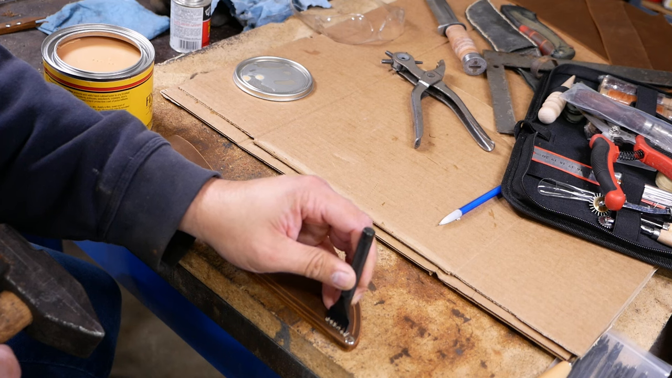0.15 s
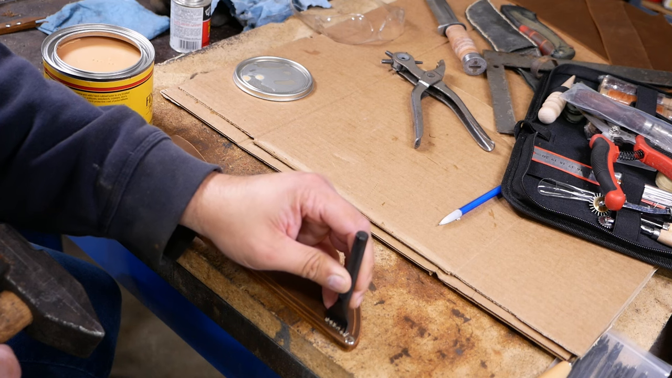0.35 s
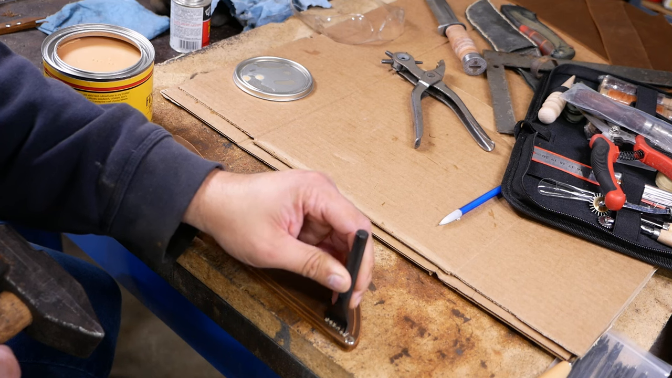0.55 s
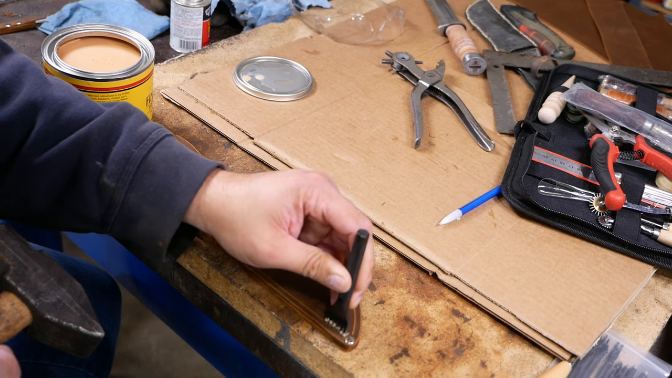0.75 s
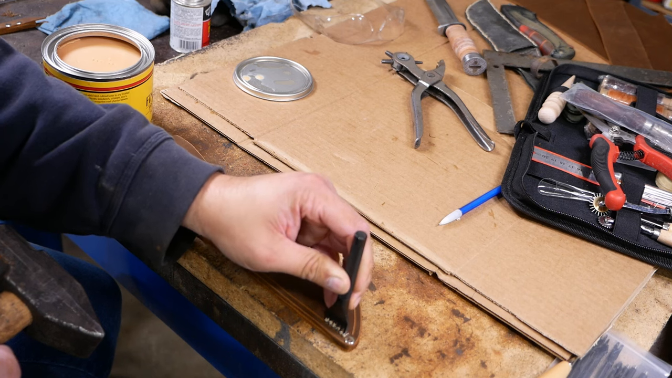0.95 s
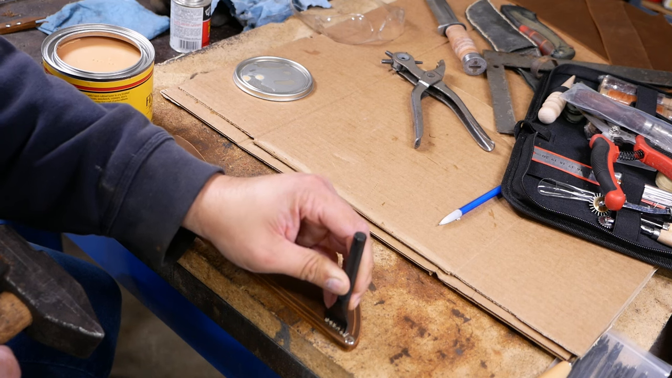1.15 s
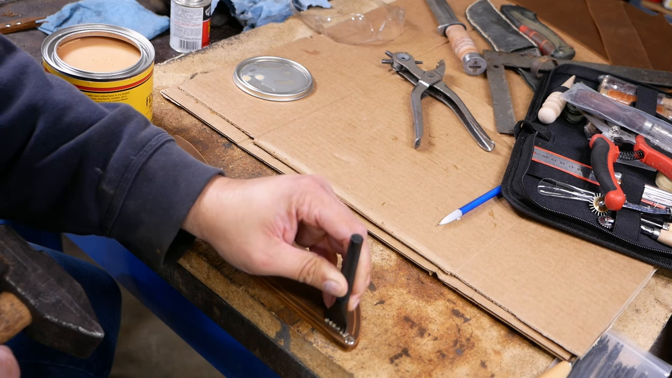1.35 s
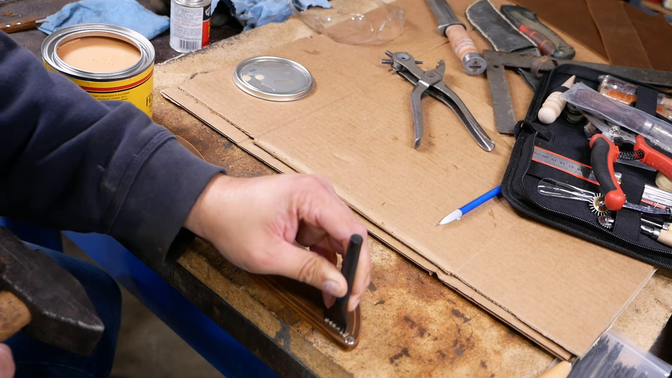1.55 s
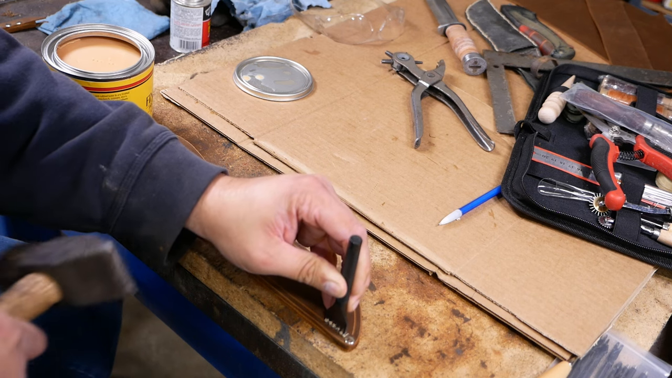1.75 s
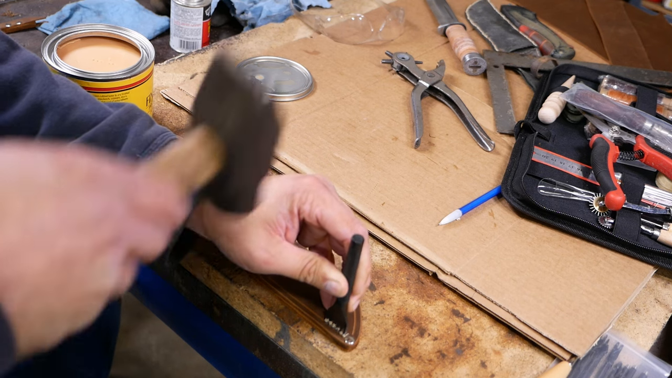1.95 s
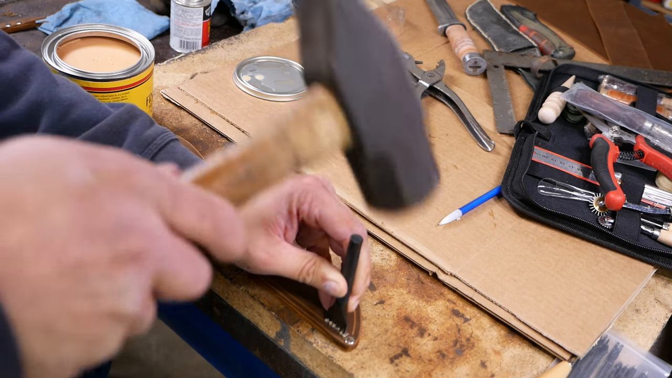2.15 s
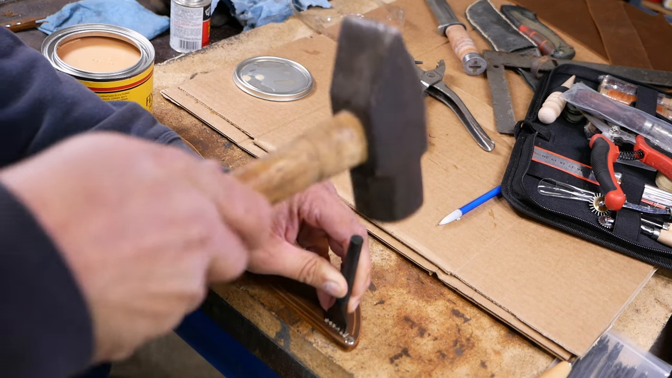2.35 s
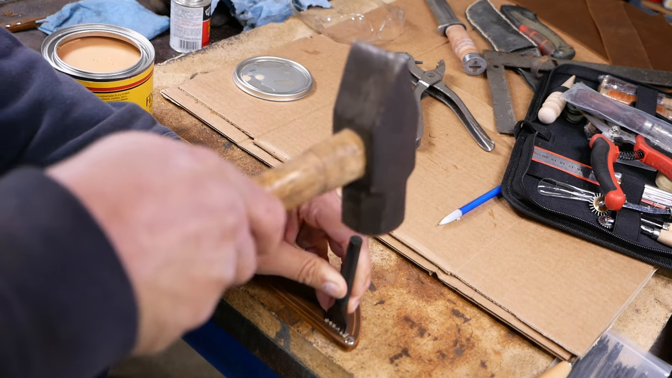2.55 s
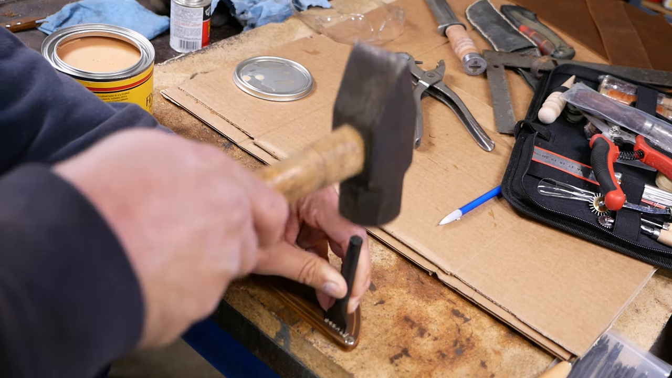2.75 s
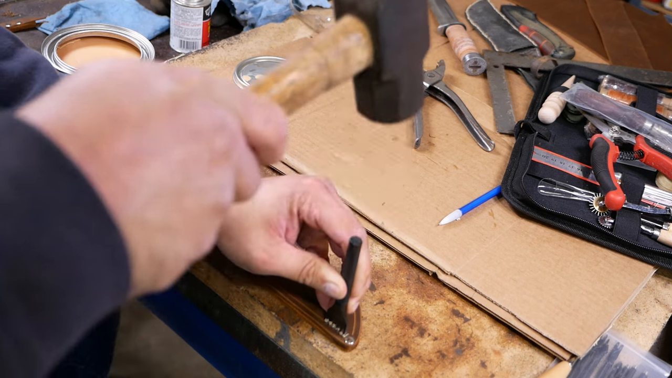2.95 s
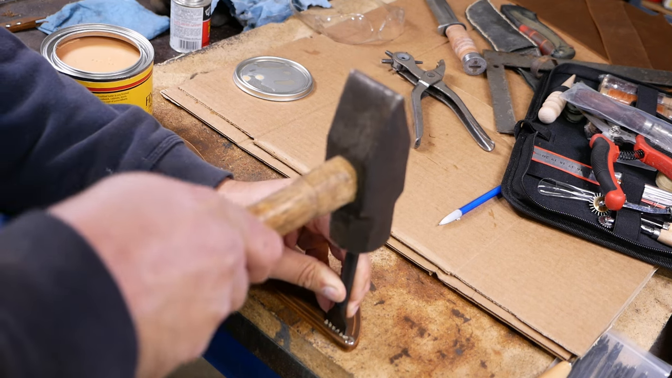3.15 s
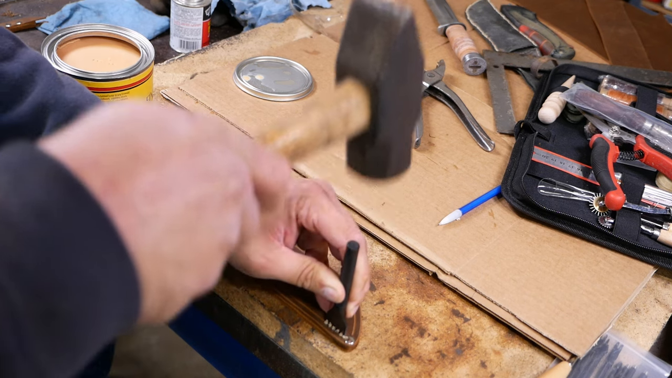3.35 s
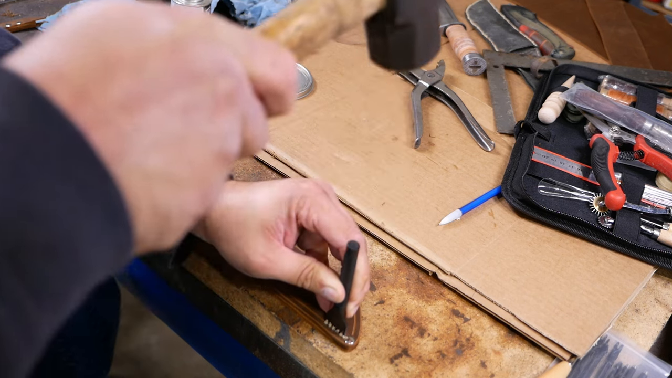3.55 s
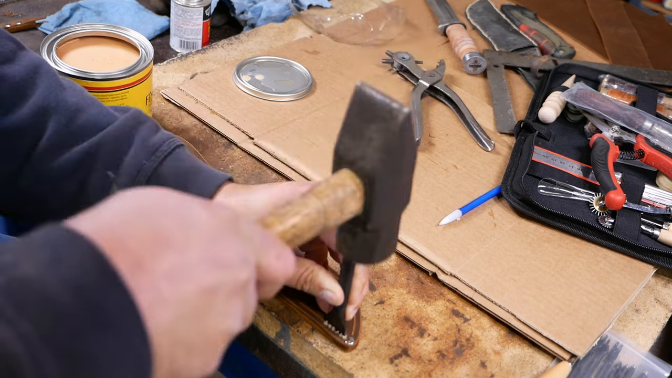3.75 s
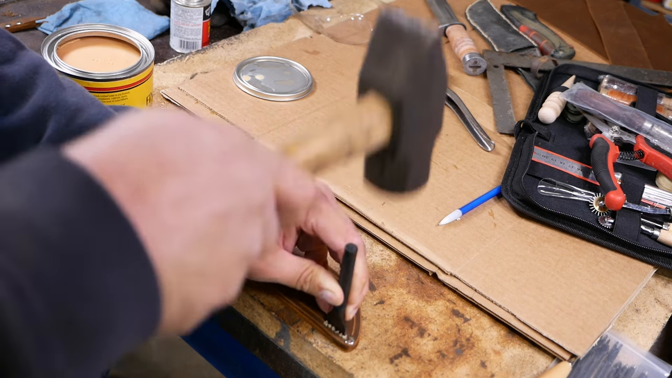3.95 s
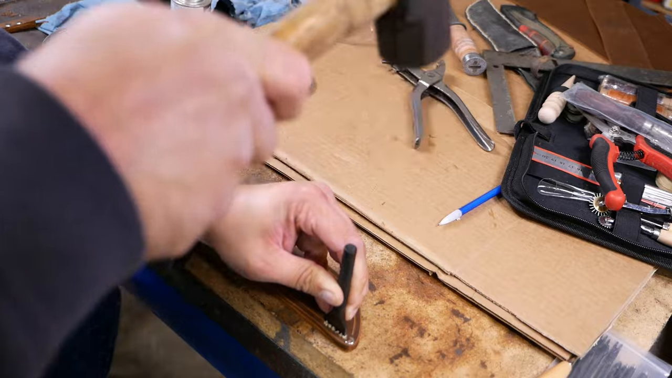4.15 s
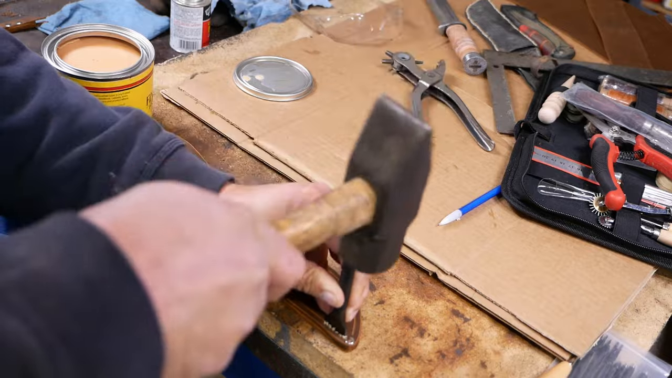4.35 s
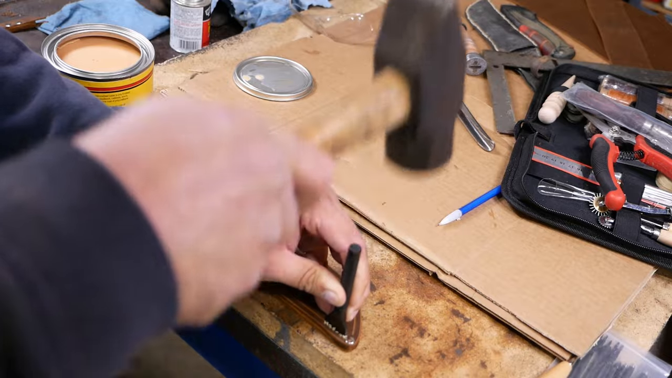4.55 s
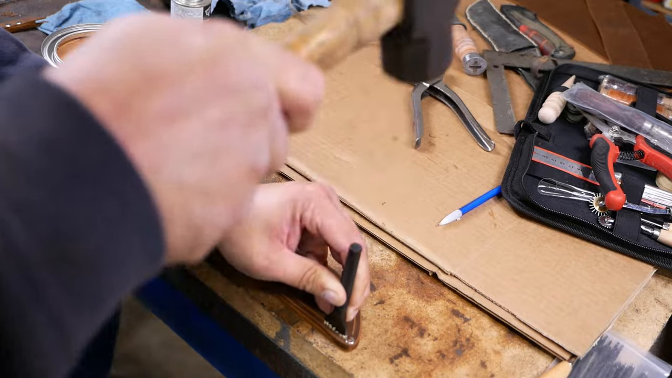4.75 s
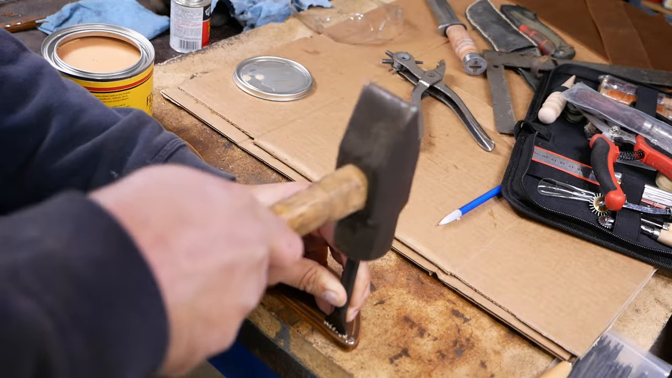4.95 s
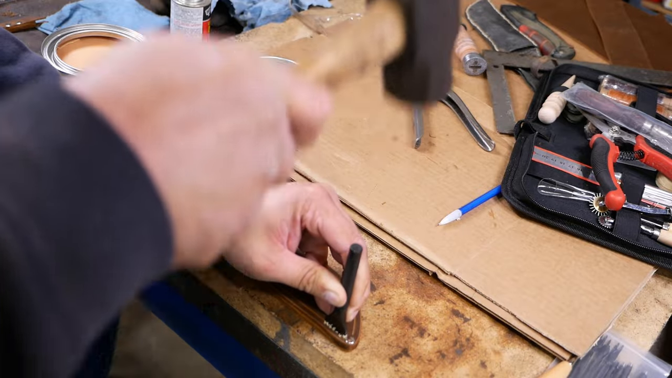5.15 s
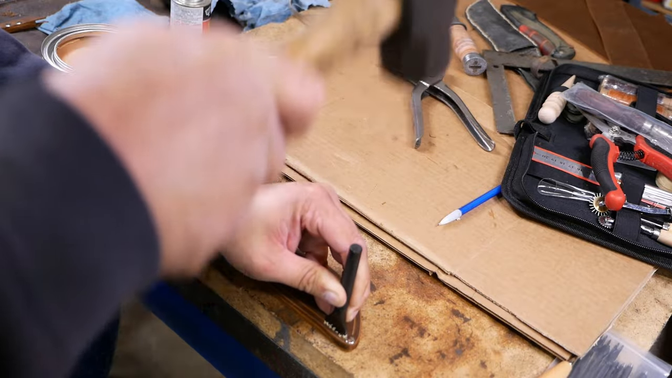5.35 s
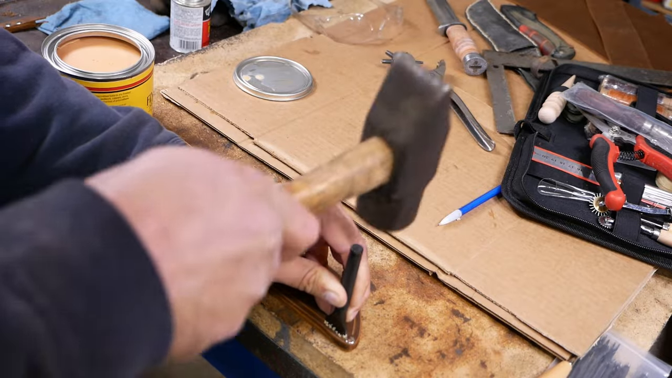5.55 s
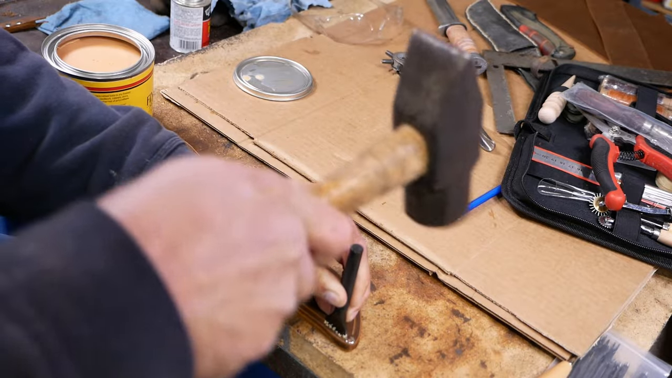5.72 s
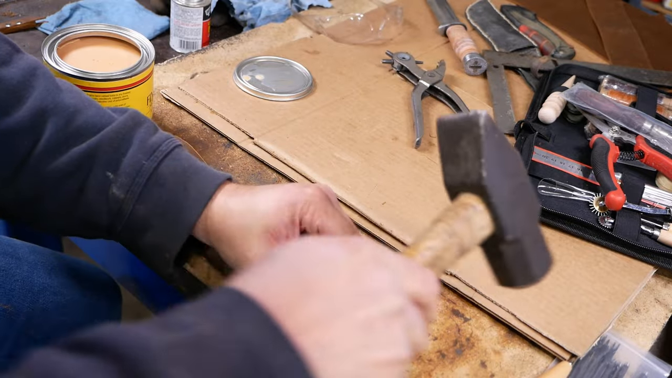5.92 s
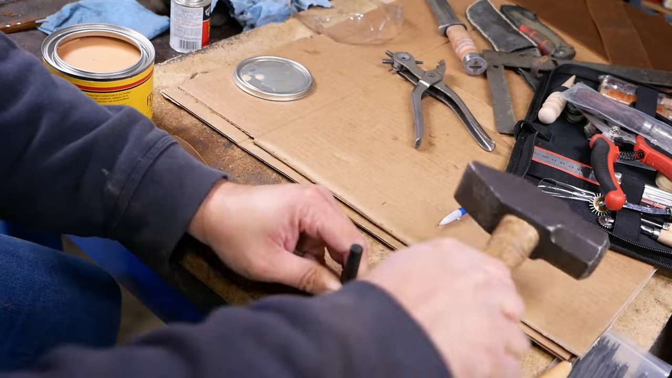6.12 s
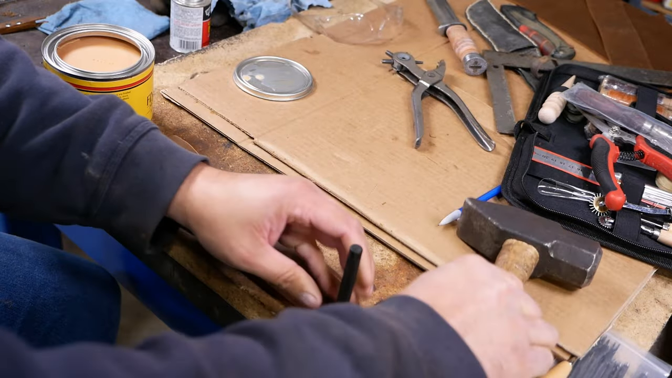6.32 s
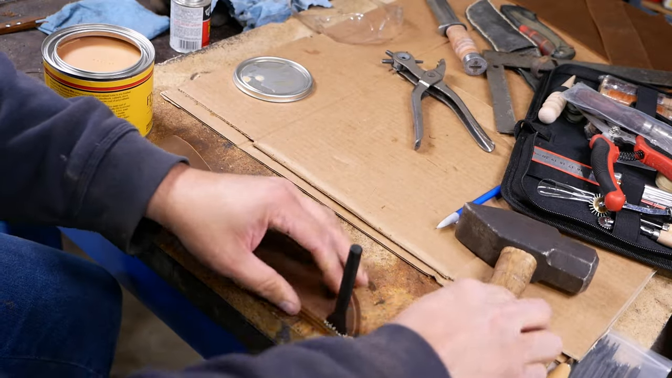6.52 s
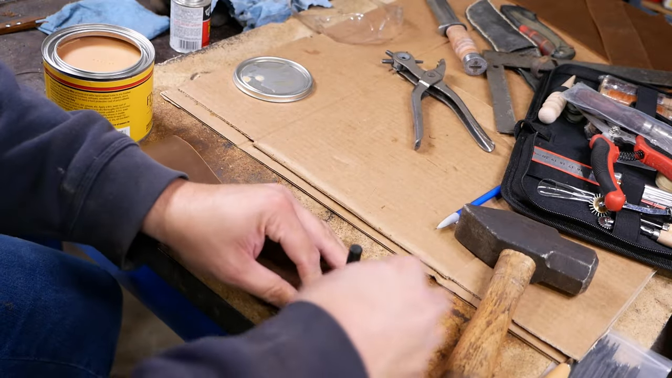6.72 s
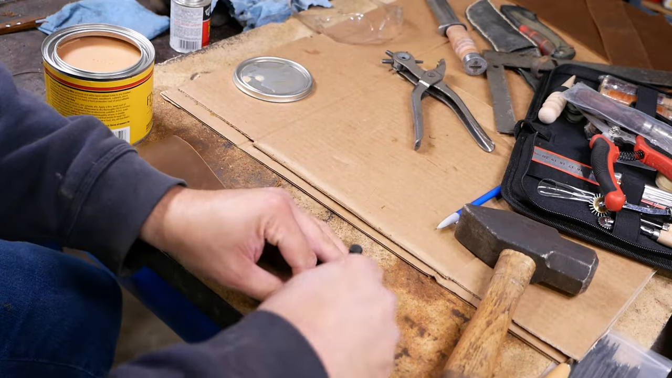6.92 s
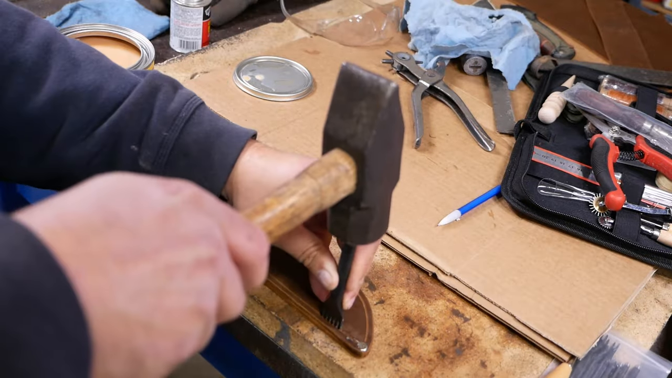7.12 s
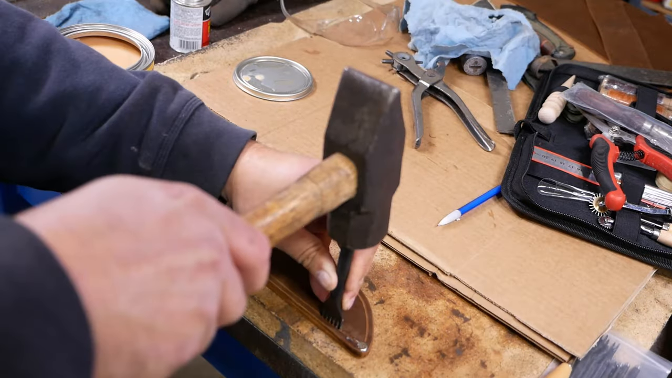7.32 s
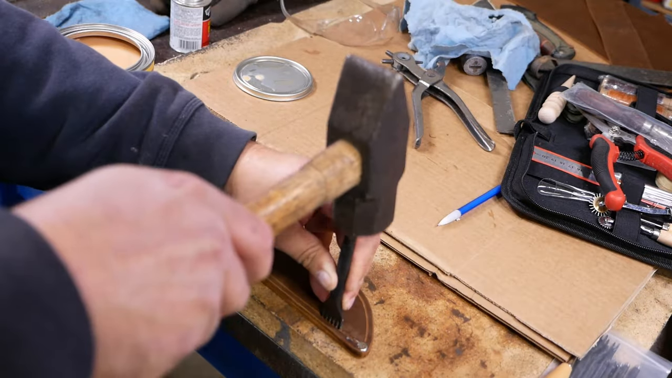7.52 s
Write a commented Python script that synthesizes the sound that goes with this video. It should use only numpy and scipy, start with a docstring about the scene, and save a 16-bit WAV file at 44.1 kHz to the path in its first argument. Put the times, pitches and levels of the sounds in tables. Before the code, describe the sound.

Four loud, clipped hammer blows on a chisel, each blooming into long echo, then tool clicks, a dull thud and two faint taps.

```python
"""A steel hammer drives a pronged chisel through leather on a wooden bench: five blows that overload the microphone,
each followed by a slowly swelling reverberation. A sleeve rustles as the hammer is raised; afterwards the chisel is
pulled free, the hammer is put down, and its head is rested on the chisel again. A low hum fills the workshop."""
import sys
import numpy as np
from scipy import signal
from scipy.fft import rfft, irfft
from scipy.io import wavfile
from scipy.ndimage import uniform_filter1d, map_coordinates

SR = 44100
rng = np.random.default_rng(int(sys.argv[2]) if len(sys.argv) > 2 else 0)


def materialize(psi):
    """Save the field psi as 16-bit PCM at rate SR to the path in sys.argv[1].

    A 1-D psi becomes a single channel; in a 2-D psi each row is a channel.
    """
    bounded = np.clip(np.atleast_2d(psi).T, -1, 1)
    quanta = np.round(bounded * 32767).astype(np.int16)
    wavfile.write(sys.argv[1], SR, quanta)


N = 338688

# hammer meeting chisel: five full blows, three rebounds, two light touches as the head is rested on it again
# (s, force dB, depth of the prongs in the leather 0-1, clack dB, steel dB, seat resonance Hz, seat dB, steel pitch Hz)
BLOWS = [
    (3.154, -1.06, 0.06, -10.5, 1.3, 1517, 3, 8410),
    (3.7725, -0.5, 0.19, -5, 1, 1872, 7.5, 7600),
    (3.8197, -22.5, 0.2, -4, -2.5, 1900, -8, 8230),
    (4.3306, 1.65, 0.47, -2, -0.5, 2453, -4, 7935),
    (4.3762, -19.5, 0.5, -8.5, -8.5, 2370, -5.5, 7690),
    (4.9238, 2.5, 0.85, -2, -1.9, 822, 0, 7570),
    (5.0005, -19, 0.89, -4, -21.5, 1091, -6.5, 7290),
    (5.4958, 2.5, 0.92, 1.5, -0.5, 800, 1, 6760),
    (7.2665, -27.5, 0.73, 2, -11, 1740, 2, 8240),
    (7.3076, -38.5, 0.93, -3.5, -26.7, 1727, 4, 7310)]
TINT_HZ = (300, 900, 2200, 6000)  # centres of thump, knock, clack and steel
# bench top under the chisel: (Hz, dB, t60 s)
BENCH = [(284.5, -2.5, 0.023), (358.4, -2, 0.023), (445, -5.5, 0.018), (622.4, 2, 0.013), (812, -1, 0.02), (953, -22.5, 0.16),
         (1098, -0.5, 0.019), (1430, -10.5, 0.015), (1656, -2.5, 0.019), (2003, -5.5, 0.014),
         (2244, -4, 0.022), (2648, 2.5, 0.012), (3143, -3.5, 0.015), (3573, -2.5, 0.013),
         (4534, -4, 0.013), (4960, -5.5, 0.016), (5555, -1.5, 0.0094)]
# the chisel, damped by the fingers: (multiple of the steel pitch, dB, t60 s)
CHISEL = [(0.638, -0.5, 0.008), (.803, 3.5, 0.0071), (1, 8.5, 0.006), (1.676, -2, 0.0056)]
# thin after-ring of the steel tools: (Hz, dB, t60 s)
TOOL_RING = [(1640, -33.5, 0.21), (1680, -14, .03), (2276, -11.5, .06), (2290, -35.5, 0.55), (2696, -46, 0.36), (4100, -42, 0.15), (6200, -55, .3)]
# small clicks of the tools in the fingers and of the prongs letting go: (s, peak dB, resonance Hz, resonance dB, brightness dB per octave, t60 s)
TICKS = [(0.315, -41.5, 2120, 2.5, 6, 0.09), (0.533, -45.5, 1170, 3, 3, .046), (1.223, -45.5, 2140, 3, 3, 0.052), (1.591, -43, 2110, 5, 8, 0.09),
         (1.899, -35, 1900, -5, 8, .04), (2.343, -43, 1100, 10, -3, .045), (2.365, -32, 1140, 5.5, -2.5, 0.03), (2.383, -47, 1180, 7, -3, .045),
         (6.374, -21, 1215, 1, 2, 0.017), (6.3915, -25, 1170, 0, 1, .02), (6.3954, -22, 1170, 4, -2, 0.039),
         (6.407, -17, 1900, 2, -4.5, 0.028), (6.4104, -17.5, 1400, 4, -4, 0.016), (6.42, -22, 1500, 2, -3, 0.016), (6.4286, -11.5, 950, -6, -1.5, 0.015),
         (6.457, -27, 950, 6.5, -4, 0.058), (6.4735, -24.5, 1000, -3, 7, 0.018), (6.508, -35, 2900, 3, -1, 0.044)]
TICK_COLOUR = [(150, -4), (500, 6), (1500, 14), (3500, -3), (8000, -7.5), (15000, -25)]  # (Hz, dB)
SLEEVE_COLOUR = [(150, -2), (500, 0), (1200, 2), (2000, -2.5), (3000, 0), (4000, -1.5), (8500, -3), (11000, -14), (15000, -18)]  # (Hz, dB)
PULL_COLOUR = [(80, -11), (250, -10), (1200, -0.5), (2200, -9.5), (3500, -15.5), (9000, -19.5), (15000, -38)]  # (Hz, dB)
# workshop air: (Hz, dB per Hz) and its level
AIR, AIR_DB = [(15, -43), (25, -13), (79, -7), (113, -7.5), (136, -17), (209, -17), (227, -20.5), (421, -22), (567, -24),
               (848, -22), (1660, -27), (2420, -33.5), (2630, -37), (3090, -37.5), (15500, -44)], -52
HUM_HZ, HUM_DB = 71.6, -65
# short workshop echo and long swelling reverberation: (Hz, energy gain dB, t60 s)
WORKSHOP = [(130, -12, 0.37), (404, -14, 0.36), (1000, -13.5, 0.12), (3026, -20.5, 0.36), (7730, -24, 0.51), (13860, -24.5, 0.17)]
BLOOM = [(25, -32, .8), (60.4, -16, 0.57), (150, -4, 0.63), (286, -10, 0.8), (478, -3.5, 0.68), (687, -1, 0.74), (1090, 2, 0.79), (1300, 3, 0.84), (1670, -2, 0.81),
         (2590, -6.5, 0.76), (3670, -9, 0.69), (4400, -11.5, 0.64), (5570, -14, .6), (7600, -21.5, 0.5), (10700, -26, 0.4), (14000, -36, .3)]
BLOOM_RISE = 2.446  # the echoes build up as this power of time
BLOOM_END_S = 7.035
# low tones that stand out of the reverberation: (Hz, dB, t60 s)
DRONE = [(253.4, -64, 1.6), (429.4, -65, 3.2), (655, -66.5, 2.0)]
TOP_HZ = 15800  # fixed
T = np.arange(N) / SR
# the hammer head landing on the cardboard: (Hz, dB, t60 s)
PUT_DOWN_S, LANDING_DRONE_DB = 6.6122, -12  # and how strongly it wakes the low tones
LANDING = [(129.6, -28, 0.31), (275, -8, 0.05), (380, -8.5, 0.045), (479, -6.5, 0.053), (663, -4.5, 0.043), (896, -11, 0.041),
           (1023, -11, 0.026), (1234, -16, 0.04), (1560, -16.5, 0.024), (1980, -13, 0.015),
           (2730, -16.5, 0.043), (3270, -19, 0.0096), (4230, -27, 0.012)]
LATE_RASP_COLOUR = [(300, -4.5), (1200, -10), (2000, 0), (3000, -18), (4600, -15), (8000, -27), (15000, -34)]  # (Hz, dB)

RUMBLE_HZ = 129.8  # upper edge of the rumble
# dull echo that lingers after the hammer is put down: (Hz, energy gain dB, t60 s)
LINGER = [(130, -24, 0.61), (270, -22, 1.4), (403, -20.5, 1.4), (652, -16.5, 1.6), (980, -10.5, 1.5), (1590, -13.5, 2.2), (2780, -20.5, 1.9), (6000, -15, 0.97)]
# (dB with the prongs on the surface, dB with them right through): the low thump gives way to a woody knock
THUMP_DB, KNOCK_DB = (4.5, 0), (-5, 4.5)
REBOUND_S = .1  # fixed
REBOUND_THUMP_DB = 6  # a hammer that falls back within REBOUND_S leans on the chisel and thumps more
BENCH_PITCH = (0.99, 0.97)  # pitch factor of the bench with the prongs on the surface and right through
STEEL_DAMPING = 0.81  # how much faster the chisel dies away at full depth
# the sleeve slides as the arm lifts and lowers the hammer: (start s, attack s, hold s, release s to -60 dB, level dB)
SLIDES = [(1.45, 0.44, 0.15, 2.1, -51), (5.85, 0.19, .3, .6, -60.5), (6.62, 0.093, 0.14, 0.7, -63), (7.56, 0.067, 0.11, .5, -63)]
# cloth and skin catching on the way, and the prongs scraping: (start s, attack s, release s to -60 dB, level dB, resonance Hz, brightness dB per octave)
SCUFFS = [(1.61, 0.1, 0.06, -46.5, 3500, 0.5), (1.898, 0.0032, 0.36, -43, 2200, 0), (1.935, .015, 0.13, -48, 500, -4), (2.077, 0.029, 0.12, -45, 2900, 3.5),
          (2.158, 0.02, 0.34, -43.5, 3170, 3), (2.242, 0.0016, 0.5, -41.5, 2150, 4), (2.27, 0.0062, 0.74, -55, 2726, -2),
          (6.392, .012, 0.14, -36.5, 1710, -5), (6.432, .008, .08, -40, 2000, -2.5), (6.452, 0.0055, 0.05, -45, 13000, 5)]
# prongs dragging out of the leather: (start s, attack s, hold s, release s to -60 dB), level
PULL, PULL_DB = (6.375, 0.021, 0.054, 1.4), -42.5
PULL_END_S = 6.63  # the chisel is free
# a faint rasping band near 2 kHz: (start s, attack s, hold s, release s to -60 dB), level
LATE_RASP, LATE_RASP_DB = (7.0, 0.039, 0.25, 1.1), -56
# a faint steady tone near the end: (start s, attack s, hold s, release s to -60 dB), pitch, level
TONE, TONE_HZ, TONE_DB = (7.25, 0.31, .3, .5), 280, -61.5
CRACK_COLOUR = [(1000, 2), (11000, -1.5), (15000, -8)]  # steel on steel: (Hz, dB)
SWELL_DB = 0.3  # level of the long reverberation
# they squeak faintly as they come free: (start s, attack s, hold s, release s to -60 dB), pitch, level
SQUEAK, SQUEAK_HZ, SQUEAK_DB = (6.53, 0.013, 0.033, .08), 4460, -54
# the low rumble sinks during the last blows and comes back when the reverberation ends
SINK_START_S = 3.9  # fixed
RUMBLE_DB, SINK_DB_PER_S, SINK_MOST_DB = 2.5, 6, 8
HISS_SINK = .2  # share of that sinking that the hiss follows
# the whole bench booms on its legs: (Hz, dB, t60 s)
BOOM = [(132.1, -33, 0.5)]
# standing waves of the reverberation and the hollows between them: (Hz, width Hz, dB)
STANDING = [(88, 16, -7.5), (130, 16, 3), (167, 6.7, -7.5), (243.8, 9, 6.5), (278, 21, -3.5), (417, 42, 5.5), (505, 35, -4), (682, 16, 3.5), (3200, 350, 2)]
# each blow colours its reverberation: (s, low peak Hz, dB, high peak Hz, dB, hollow Hz, dB)
TAIL_COLOUR = [(3.1543, 1550, -2, 5700, 1.5, 2250, -8), (3.7724, 1800, 4, 6350, 5, 5400, -2.5), (4.3305, 2100, 1.5, 3196, 3.5, 4200, -0.5),
               (4.9238, 1500, 3, 3400, 3, 6500, -3.5), (5.4959, 1400, 3, 2300, 1.5, 3700, -2)]
TAIL_WIDTH = .11  # width of those peaks as a share of their pitch
DRONE_GROWTH_DB_PER_S = 5  # each blow wakes the low tones more than the one before
TAIL_AIR_HZ, TAIL_AIR_WIDTH_HZ = 13000, 3200  # the top of the reverberation
TAIL_AIR_DB = (1, -7)  # its level after the first blow and after the last
# the handle landing just after the head: (Hz, dB, t60 s)
HANDLE = [(239, -7, 0.031), (337, -3, .04), (547, 0, 0.028), (760, -6, .025)]


def undb(db):
    """Decibels to gain."""
    return 10 ** (np.asarray(db) / 20)


def log_interp(hz, points, values):
    """Straight lines on a log-frequency axis."""
    return np.interp(np.log(np.maximum(hz, 1)), np.log(points), values)


def fade(t, t60):
    """Exponential decay by 60 dB in t60."""
    return np.exp(-np.log(1000) * t / t60)


def colour(x, spectrum, tilt_db=0):
    """Shape x with a (Hz, dB) spectrum and a slope per octave; rms 1."""
    hz = np.maximum(np.fft.rfftfreq(len(x), 1 / SR), 1)
    db = log_interp(hz, *np.transpose(spectrum)) + tilt_db * np.log2(np.maximum(hz, 200) / 2000)  # fixed
    y = irfft(rfft(x) * undb(db), len(x))
    return y / y.std()


def walk(rate):
    """Random levels held 1 / rate s and slewed; spread near 1."""
    k = int(SR / rate)
    return 1.2 * uniform_filter1d(np.repeat(rng.standard_normal(N // k + 1), k), k)[:N]  # fixed


def add(track, s, sound):
    """Mix a sound into the track at time s."""
    i = int(s * SR)
    track[i:i + len(sound)] += sound[:N - i]


def ring(modes, t):
    """Damped sines set off by one impulse."""
    return sum(undb(db) * np.sin(2 * np.pi * hz * t) * fade(t, t60) for hz, db, t60 in modes)


def reverberate(x, bands, rise):
    """Diffuse echoes that build up as time ** rise and die away band by band."""
    t = T[:2 * SR]
    noise, hz = rfft(rng.standard_normal(len(t))), np.fft.rfftfreq(len(t), 1 / SR)
    response = 0
    for own, (_, db, t60) in zip(np.eye(len(bands)), bands):
        envelope = t ** rise * fade(t, t60)
        band = irfft(noise * log_interp(hz, [b[0] for b in bands], own))
        response = response + undb(db) * band * envelope / np.linalg.norm(envelope)
    return signal.fftconvolve(x, response)[:N]


def hammer(crack_db=-2, crack_t60=0.014, build_s=0.00065, contact_s=.0004, after_db=-6, seat_t60=0.0077, detune=0.0097):
    """Each contact rings the chisel and the bench; the deeper the prongs sit, the more the wood knocks and the shorter the steel rings."""
    out, t = np.zeros(N), T[:SR // 2]
    previous_s = -np.inf
    for s, force_db, depth, clack_db, steel_db, seat_hz, seat_db, steel_hz in BLOWS:
        depth = np.clip(depth, 0, 1)
        thump_db = np.interp(depth, (0, 1), THUMP_DB) + REBOUND_THUMP_DB * (s - previous_s < REBOUND_S)
        knock_db = np.interp(depth, (0, 1), KNOCK_DB)
        tint = lambda hz: log_interp(hz, TINT_HZ, [thump_db, knock_db, clack_db, steel_db])
        shift = np.interp(depth, (0, 1), BENCH_PITCH) + detune * rng.uniform(-0.82, 1, len(BENCH))  # no two blows load the board alike
        # neighbouring modes of the board move in opposite directions at the struck point
        wood = sum((-1) ** k * ring([(hz * shift[k], db + tint(hz), t60)], t) for k, (hz, db, t60) in enumerate(BENCH))
        seat = ring([(seat_hz, seat_db, seat_t60)], t)  # the chisel bouncing on its seat in the leather
        body = (wood + seat + ring(BOOM, t)) * (1 - np.exp(-t / build_s))  # the leather cushions the push
        steel = ring([(k * steel_hz, db, t60 / (1 + STEEL_DAMPING * depth)) for k, db, t60 in CHISEL], t)
        crack = undb(crack_db) * colour(rng.standard_normal(len(t)), CRACK_COLOUR) * fade(t, crack_t60)
        clang = undb(steel_db) * (steel + crack) * (1 - np.exp(-t / contact_s))
        after_ring = undb(clack_db - 0.3 * force_db + after_db) * ring(TOOL_RING, t)  # a firm blow smothers it
        add(out, s, undb(force_db) * (body + clang + after_ring))
        previous_s = s
    return out


def handling(gain_db=-9, sharpness=8):
    """Short dry clicks, each with one resonance, as fingers shift the chisel and the hammer."""
    out, t = np.zeros(N), T[:SR // 6]
    for s, db, hz, resonance_db, tilt_db, t60 in TICKS:
        noise = rng.standard_normal(len(t))
        click = colour(noise, TICK_COLOUR, tilt_db) + undb(resonance_db) * resonate(noise, hz, sharpness)
        add(out, s, undb(db + gain_db) * click * fade(t, t60))
    return out


def rub(spectrum, grain_db, patchy_db, tilt_db=0):
    """Friction: dense tiny slips of uneven size that come in patches."""
    slips = rng.standard_normal(N) * undb(grain_db * np.repeat(rng.exponential(size=N // 16 + 1), 16)[:N])  # fixed
    return colour(slips, spectrum, tilt_db) * undb(patchy_db * walk(60))


def workshop_air(air_db=-0.5):
    """Steady hiss over a low rumble, with a wavering hum and a faint late tone."""
    air = undb(AIR_DB + air_db + .5 * walk(1.8)) * colour(rng.standard_normal(N), AIR)
    rumble = signal.sosfiltfilt(signal.butter(2, RUMBLE_HZ, fs=SR, output="sos"), air)
    hum = np.sqrt(2) * np.sin(2 * np.pi * HUM_HZ * T + .8 * walk(6.0)) * undb(HUM_DB + 2.0 * walk(11))
    tone = np.sqrt(2) * np.sin(2 * np.pi * TONE_HZ * T) * undb(TONE_DB) * envelope(*TONE)
    sunk_db = np.clip(SINK_DB_PER_S * (T - SINK_START_S), 0, SINK_MOST_DB)
    sunk_db = sunk_db * np.interp(T, (BLOOM_END_S - .06, BLOOM_END_S), (1, .18))
    hiss = (air - rumble) * undb(-HISS_SINK * sunk_db)
    return hiss + (rumble + hum) * undb(RUMBLE_DB - sunk_db + 2.1 * walk(20)) + tone


def put_down(build_s=0.00035, gain_db=-2, slap_db=-24, slap_tilt_db=-4, slap_t60=0.098, handle_s=0.00549, handle_db=-6, handle_build_s=0.0011):
    """The heavy head slaps the cardboard, thuds on the bench below, pings briefly, and its handle lands a
    moment later."""
    out, t = np.zeros(N), T[:SR // 2]
    thud = sum((-1) ** k * ring([mode], t) for k, mode in enumerate(LANDING))
    slap = undb(slap_db) * colour(rng.standard_normal(len(t)), TICK_COLOUR, slap_tilt_db) * fade(t, slap_t60)
    add(out, PUT_DOWN_S, undb(gain_db) * (thud + slap) * (1 - np.exp(-t / build_s)))
    add(out, PUT_DOWN_S + handle_s, undb(gain_db + handle_db) * ring(HANDLE, t) * (1 - np.exp(-t / handle_build_s)))
    return out


def swell(x, bands, rise, count=4, drift_hz=2, drift_s=.005):
    """A long reverberation fed through slowly drifting delays, which smear its colour."""
    out = 0
    for k in range(count):
        delay = drift_s * np.sin(2 * np.pi * (drift_hz * T + k / count))
        out = out + reverberate(map_coordinates(x, [(T - delay) * SR], order=3, prefilter=False), bands, rise)
    return out / np.sqrt(count)


def envelope(start_s, attack_s, hold_s, release_s):
    """Gain that rises in a straight line, holds, and falls by 60 dB over the release."""
    t = T - start_s
    return np.clip(t / max(attack_s, .001), 0, 1) * fade(np.maximum(t - attack_s - hold_s, 0), release_s)


def resonate(x, hz, sharpness):
    """One resonance picked out of x; rms 1."""
    y = signal.lfilter(*signal.iirpeak(hz, sharpness, fs=SR), x)
    return y / y.std()


def sleeve(resonance_db=-3, sharpness=8):
    """Long slides of cloth, with brief scuffs that each rasp at their own pitch."""
    out = sum(undb(db) * envelope(*shape) for *shape, db in SLIDES) * rub(SLEEVE_COLOUR, grain_db=1.5, patchy_db=2.5)
    for s, attack_s, release_s, db, hz, tilt_db in SCUFFS:
        catch = rub(SLEEVE_COLOUR, grain_db=1.9, patchy_db=1.5, tilt_db=tilt_db)
        rasp = catch + undb(resonance_db) * resonate(catch, hz, sharpness)
        out = out + undb(db) * envelope(s, attack_s, 0, release_s) * rasp
    return out


def chisel_moved(free_t60=.1, squeak_sharpness=40):
    """The prongs drag out of the leather, ever more easily, and squeak. Later, apart from the chisel, a faint
    rasp near 2 kHz sets in."""
    drag = undb(PULL_DB) * envelope(*PULL) * fade(np.maximum(T - PULL_END_S, 0), free_t60)
    drag = drag * rub(PULL_COLOUR, grain_db=2.5, patchy_db=3.0)
    squeak = undb(SQUEAK_DB) * envelope(*SQUEAK) * resonate(rng.standard_normal(N), SQUEAK_HZ, squeak_sharpness)
    late_rasp = undb(LATE_RASP_DB) * envelope(*LATE_RASP) * rub(LATE_RASP_COLOUR, grain_db=-1.5, patchy_db=3.5)
    return drag + squeak + late_rasp


def drone(x, build_s=0.17):
    """Low tones that build up in the reverberation and outlast the rest of it."""
    t = T[:3 * SR]
    return signal.fftconvolve(x, ring(DRONE, t) * (1 - np.exp(-t / build_s)))[:N]


def bells(x, peaks):
    """Lift or lower x around each (Hz, width Hz, dB), keeping its attack."""
    hz = np.fft.rfftfreq(len(x), 1 / SR)
    db = sum(gain_db * np.exp(-((hz - centre) / width) ** 2) for centre, width, gain_db in peaks)
    cepstrum = irfft(np.log(undb(db)), len(x))
    cepstrum[1:len(x) // 2] *= 2
    cepstrum[len(x) // 2 + 1:] = 0
    return irfft(rfft(x) * np.exp(rfft(cepstrum)), len(x))


def coloured_blows(x):
    """What each blow sends into the reverberation, with its own peaks and hollow, duller blow by blow."""
    out = np.zeros(N)
    for s, *peaks in TAIL_COLOUR:
        start_s = s - .005  # fixed
        blow = x[int(start_s * SR):][:SR // 2]
        shape = [(hz, TAIL_WIDTH * hz, db) for hz, db in zip(peaks[::2], peaks[1::2])]
        air_db = np.interp(s, (TAIL_COLOUR[0][0], TAIL_COLOUR[-1][0]), TAIL_AIR_DB)
        add(out, start_s, bells(blow, shape + [(TAIL_AIR_HZ, TAIL_AIR_WIDTH_HZ, air_db)]))
    return bells(out, STANDING)


def scene():
    """Everything on the bench, with the short echo of the workshop."""
    near = hammer() + put_down() + handling() + sleeve() + chisel_moved()
    return (near + reverberate(near, WORKSHOP, rise=0.12) + workshop_air())[None]


def record(dry):
    """The blows clip flat and swell into a long reverberation; the put-down just dies away; both tails stop abruptly."""
    clipped = signal.resample_poly(np.clip(signal.resample_poly(dry[0], 2, 1), -1, 1), 1, 2)
    hammering = (T > BLOWS[0][0] - .004) * (T < PULL[0])  # fixed
    landed = T > PUT_DOWN_S - .004  # fixed
    growth = undb(DRONE_GROWTH_DB_PER_S * np.minimum(T - BLOWS[5][0], 0))
    tails = undb(SWELL_DB) * swell(coloured_blows(clipped), BLOOM, BLOOM_RISE) + swell(clipped * landed, LINGER, rise=0.2)
    tails = tails + drone(clipped * (growth * hammering + undb(LANDING_DRONE_DB) * landed))
    sound = clipped + tails * np.clip((BLOOM_END_S - T) / 0.034, 0, 1)
    return signal.sosfiltfilt(signal.ellip(8, .1, 60, TOP_HZ, fs=SR, output="sos"), sound)[None]  # fixed


dry = scene()
out = record(dry)
materialize(out)
```